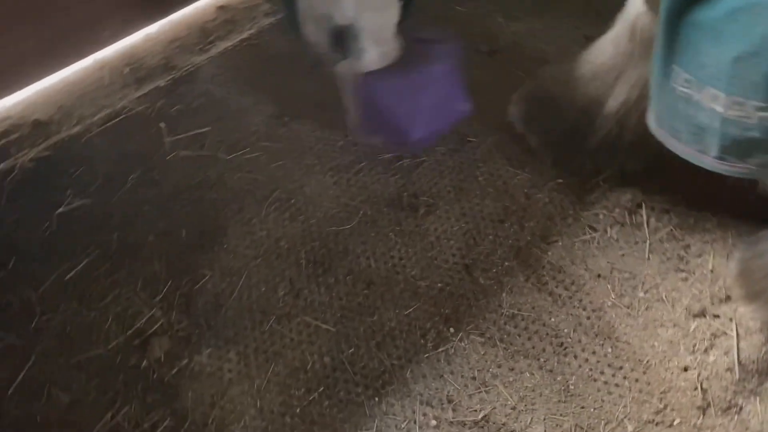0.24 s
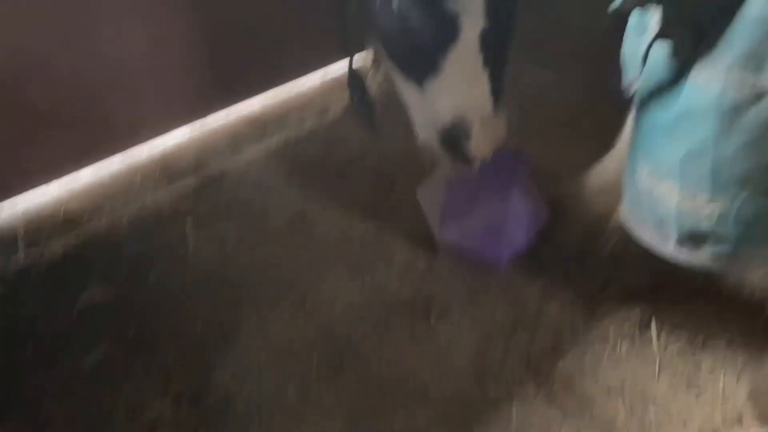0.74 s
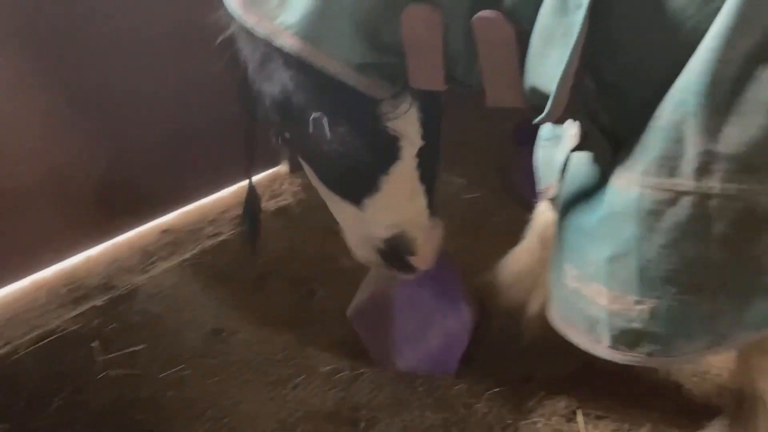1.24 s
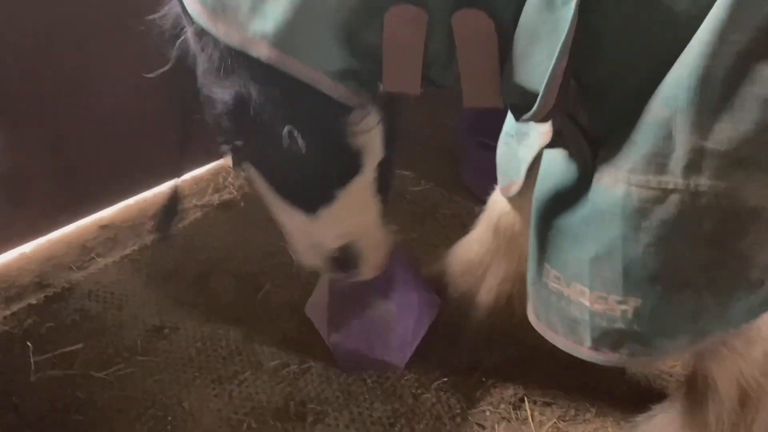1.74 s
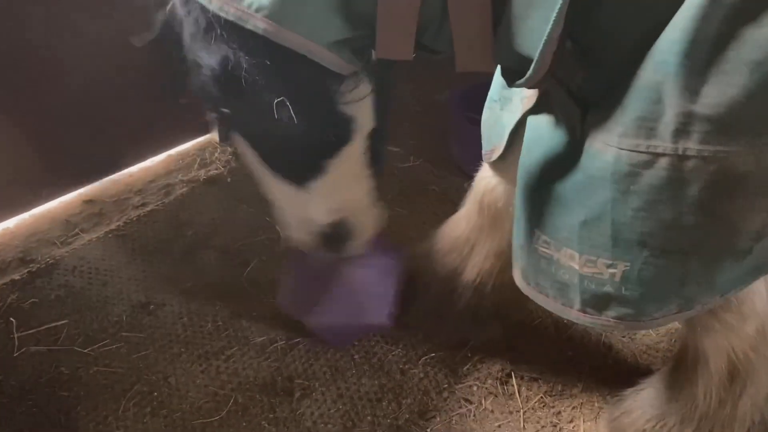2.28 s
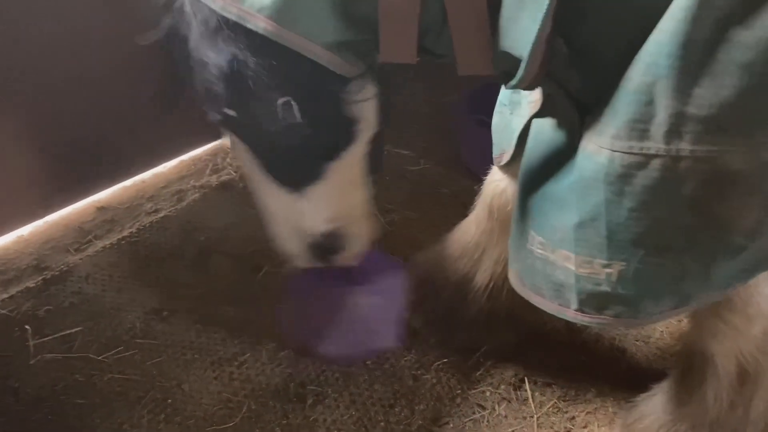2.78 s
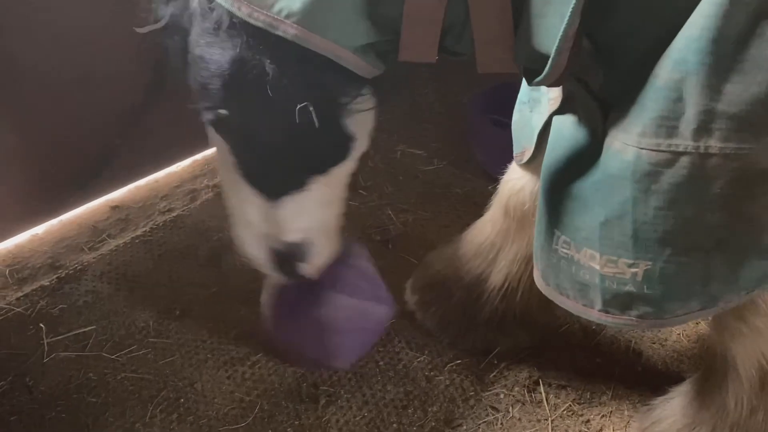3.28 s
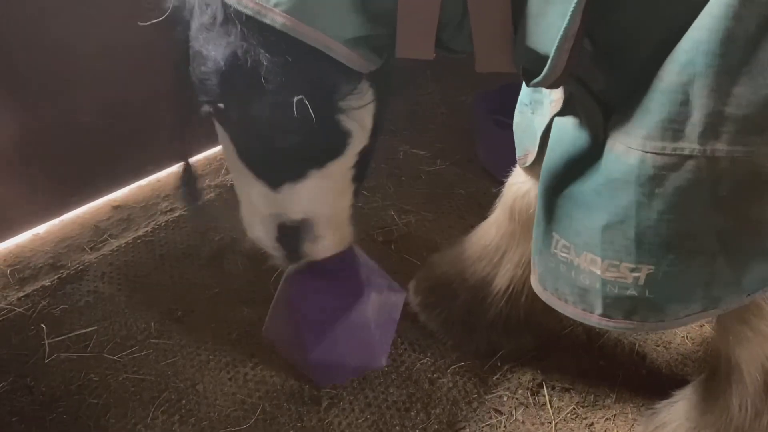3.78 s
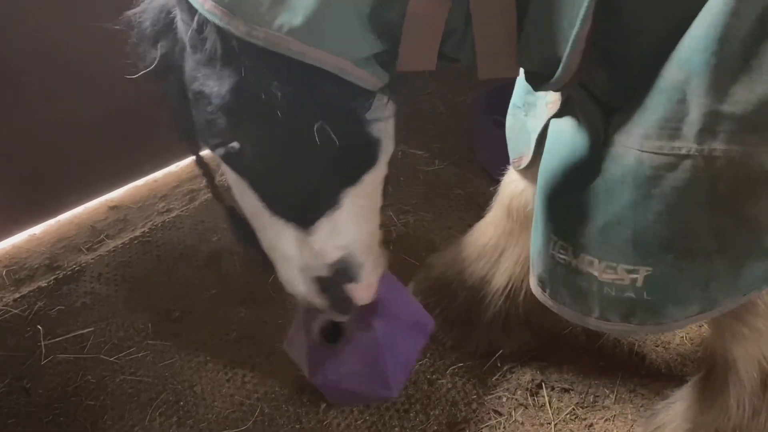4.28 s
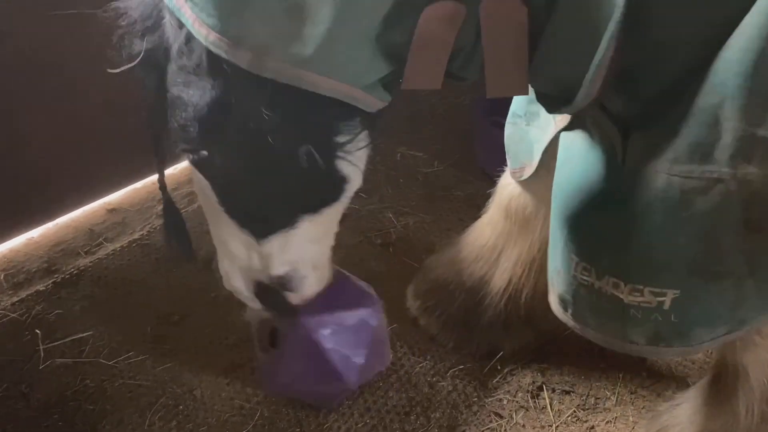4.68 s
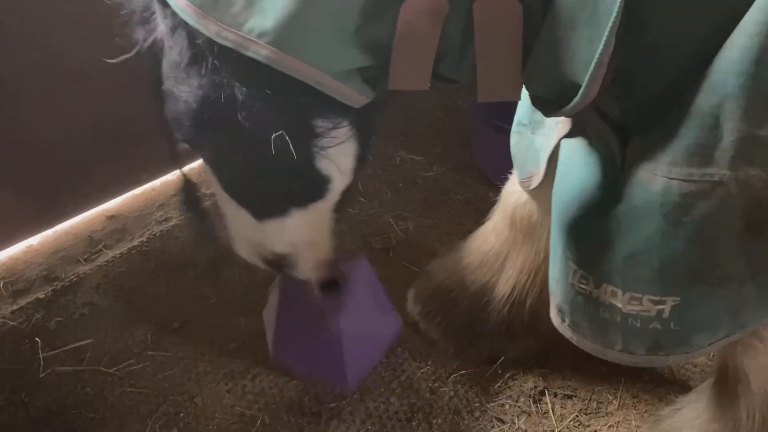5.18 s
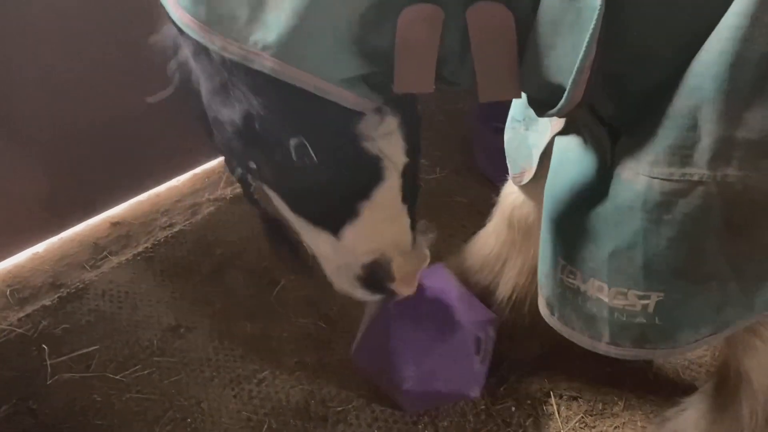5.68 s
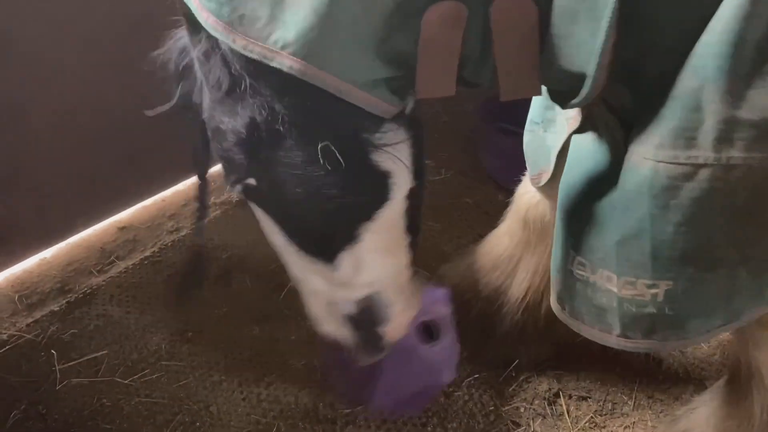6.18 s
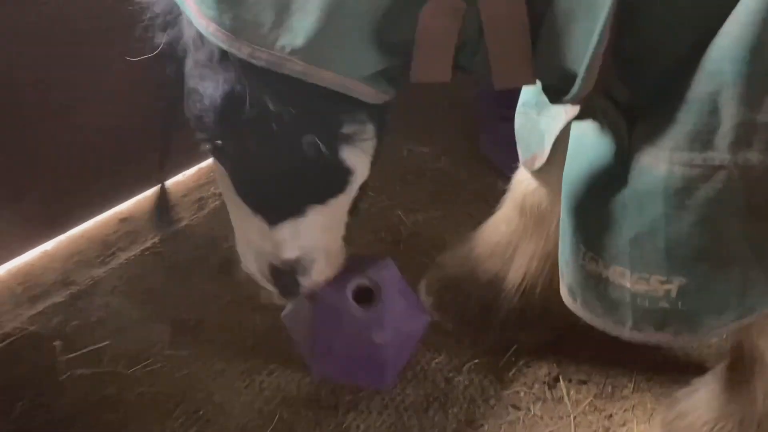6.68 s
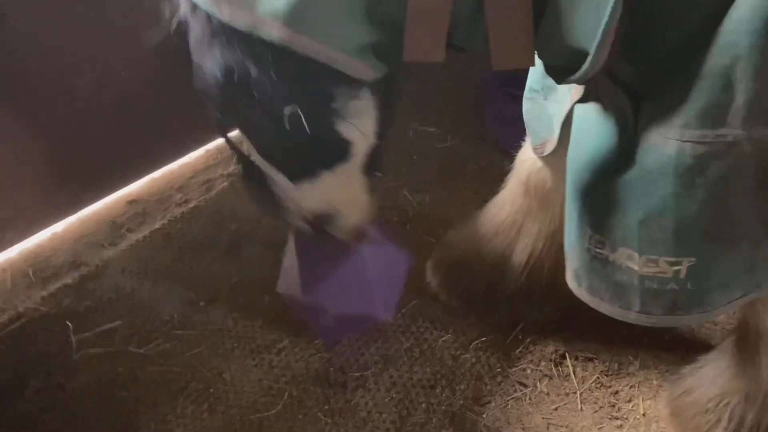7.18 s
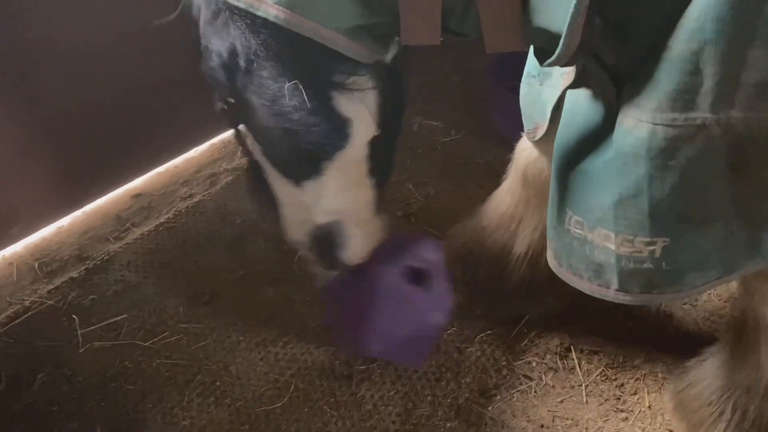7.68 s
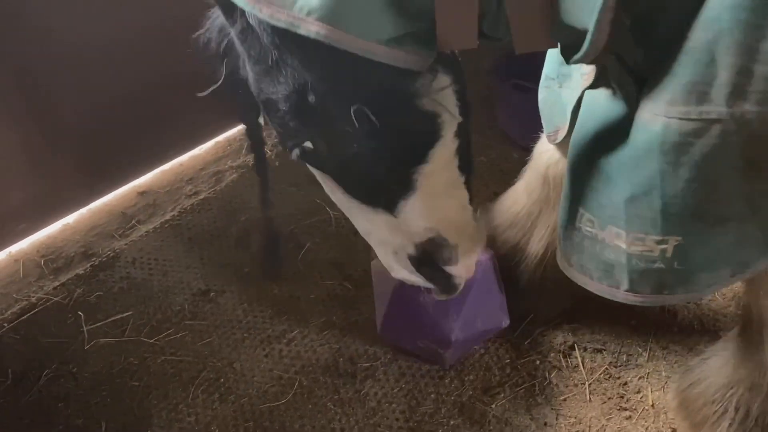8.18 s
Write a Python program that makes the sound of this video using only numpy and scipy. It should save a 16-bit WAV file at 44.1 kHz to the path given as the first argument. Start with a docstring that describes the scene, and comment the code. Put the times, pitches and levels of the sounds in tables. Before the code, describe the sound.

A horse noses a hollow hard plastic treat ball over a stable's rubber mat, pellets rattling and swishing inside between dull knocks.

```python
"""Treat ball in a stable

A horse noses a hollow, many-sided plastic treat ball over the rubber mat of its stable.
Feed pellets are random impacts, coloured by the face they hit and smeared by short dense rings.
Each tip onto a face is a hollow note that sags in pitch, with bass and a knock; the cavity drones and booms.
Light taps ring the shell and brushing is swelling hiss; a wavering hum and a quiet room lie behind."""
import sys
import numpy as np
from scipy import signal
from scipy.fft import rfft, irfft, next_fast_len
from scipy.io import wavfile

SR = 44100
rng = np.random.default_rng(int(sys.argv[2]) if len(sys.argv) > 2 else 0)


def unload_wav(signal):
    """Save mono or channel-first audio to the path in sys.argv[1] as 16-bit WAV at rate SR, clipped to [-1, 1]."""
    wavfile.write(
        sys.argv[1],
        SR,
        np.round(np.clip(np.atleast_2d(signal).T, -1, 1) * 32767).astype(np.int16),
    )


N = 372204
TIME = np.arange(N) / SR
PADDED = next_fast_len(N + SR)   # room for tails to ring past the end
FREQS = np.maximum(np.fft.rfftfreq(PADDED, 1 / SR), 1)
CUTOFF_HZ = 16000


def from_db(db):
    """Decibels to gain."""
    return 10 ** (np.asarray(db) / 20)


def rms_one(x):
    """Scale to unit rms."""
    return x / np.sqrt(np.mean(x ** 2) + 1e-20)


def at_hz(points):
    """A table read over log frequency, at every bin."""
    hz, value = np.transpose(points)
    return np.interp(np.log(FREQS), np.log(np.maximum(hz, 1)), value)


def colour(x, response):
    """Pass a sound through a frequency response."""
    return irfft(rfft(x, PADDED) * response, PADDED)[..., :N]


def drift(per_s):
    """Slow random wandering around zero: normal random knots, per_s of them a second, joined by lines."""
    knots = rng.standard_normal(4000)
    return np.interp(TIME * per_s, np.arange(len(knots)), knots)


def resonance(hz, width_hz):
    """Response of one damped resonance, 1 at its top."""
    return 1 / (1 + 1j * (FREQS ** 2 - hz ** 2) / (FREQS * width_hz))


def dense_ring(t60):
    """Response of countless close modes dying together, unit energy."""
    t = TIME[:SR // 2]
    tail = rng.standard_normal(len(t)) * from_db(-60 * t / t60)
    return rfft(tail / np.linalg.norm(tail), PADDED)


def ring_pair(t60):
    """Two independent dense rings, one for each side."""
    return np.array([dense_ring(t60), dense_ring(t60)])


def mode_ring(modes):
    """Sum of sine modes that each die away at their own rate."""
    return sum(from_db(db - 60 * TIME / t60) * np.sin(2 * np.pi * hz * TIME) for hz, db, t60 in modes)


def to_stereo(direct, scattered):
    """Direct sound is shared by left and right with a phase difference set per band; scattered differs in each."""
    # phase of left relative to right: frequency_hz, phase_rad
    side_phase = [(0, 0.38), (690, 0.5), (1290, 7.12), (2330, 12.15), (3270, 13.9), (4220, 11.22),
                  (6370, 18.73), (9650, 15.0), (10400, 12.6), (11700, 12.3), (12500, 8.92), (13800, 9.18),
                  (14600, 6.08), (16500, 4.98)]
    # level of left relative to right: frequency_hz, balance_db
    side_balance = [(60, 6), (170, 0), (330, 2), (620, 3.5), (850, 7), (1400, 5.5), (2500, 2), (5000, 3),
                    (8000, -0.5)]
    # share of power that is direct on both sides: frequency_hz, likeness (0-1)
    side_likeness = [(100, 0.77), (350, 0.83), (700, 0.49), (1400, 0.42), (2400, 0.69), (4500, 0.28),
                     (9000, 1), (15000, 0.62)]
    alike = np.clip(at_hz(side_likeness), 0, 1)
    halves = np.array([[.5], [-.5]])   # each side takes half the difference
    turn = np.exp(1j * at_hz(side_phase) * halves)
    balance = from_db(at_hz(side_balance) * halves)
    spectrum = balance * (np.sqrt(alike) * direct * turn + np.sqrt(1 - alike) * scattered)
    return irfft(spectrum, PADDED)[:, :N]


def background(hum_hz, waver_hz):
    """A hum wavering in pitch and level, swelling once, over faint coloured room noise."""
    # colour of the quiet stable: frequency_hz, density_db (relative, per Hz)
    air_colour = [(25, -10.5), (60, 8.5), (120, -3), (250, -3.5), (500, -9.5), (1500, -24), (4000, -33),
                  (15000, -38.5)]
    hum_db, air_db = -61, -56.5   # the hum's level is before its swell
    swell_at_s, swell_half_s, swell_db = 7.87, 0.2, 12.5
    level_db = hum_db + swell_db * np.exp(-((TIME - swell_at_s) / swell_half_s) ** 2)
    phase = 2 * np.pi * np.cumsum(hum_hz + waver_hz * drift(per_s=90)) / SR
    unsteady = from_db(5 * np.minimum(drift(per_s=25), 1))
    hum = rms_one(np.sin(phase) * unsteady)
    # one noise shared by both sides, and a weaker one for each
    noise = rng.standard_normal(N) + .5 * rng.standard_normal((2, N))
    air = colour(noise, from_db(at_hz(air_colour)))
    return from_db(level_db) * hum + from_db(air_db) * rms_one(air)


def flow_db():
    """Level of the sliding pellets: every nudge swells, holds and settles."""
    # nudges that roll the ball: full_flow_s, hold_s, level_db
    nudge_table = [(0.11, 0.0037, -40.5), (0.192, 0.13, -34.5), (0.57, 0.11, -27.5), (0.935, 0.14, -33),
                   (1.111, 0.21, -27.5), (1.37, 0.087, -28), (1.542, 0.043, -28.5), (1.62, 0.19, -34),
                   (1.909, 0.042, -18.5), (2.049, 0.39, -31), (2.21, 0.0065, -19.5), (2.29, 0.052, -32),
                   (2.422, 0.075, -25.5), (2.72, 0.078, -22), (2.87, 0.061, -32.5), (2.974, 0.15, -23.5),
                   (3.2, 0.033, -40.5), (3.31, 0.13, -49.5), (3.896, 0.13, -47), (4.057, 0.057, -28),
                   (4.228, 0.0081, -44), (4.437, 0.064, -37), (4.61, 0.31, -34), (4.9, 0.21, -40),
                   (5.101, 0.095, -23.5), (5.29, 0.26, -38), (5.485, 0.1, -21), (5.844, 0.071, -27),
                   (6.1, 0.17, -33.5), (6.33, 0.042, -39), (6.433, 0.11, -24), (6.6, 0.16, -38.5),
                   (6.972, 0.085, -39), (7.08, 0.065, -28.5), (7.2, 0.07, -39.5), (7.46, 0.15, -44),
                   (7.65, 0.074, -21.5), (7.82, 0.18, -54), (8.167, 0.15, -35.5), (8.299, 0.14, -33),
                   (8.411, 0.046, -23.5)]
    swell_db_per_s, settle_db_per_s = 235, 199.5
    stirring_db = -61.5   # a few pellets never lie quite still
    power = from_db(stirring_db) ** 2
    for s, hold_s, db in nudge_table:
        before_db = swell_db_per_s * np.maximum(s - TIME, 0)
        after_db = settle_db_per_s * np.maximum(TIME - s - hold_s, 0)
        power = power + from_db(db - np.minimum(before_db + after_db, 100)) ** 2
    return 10 * np.log10(power)


def clatter_power(rise_s, slap_s):
    """A heap lands with a slap and then settles: power of its body and of its treble."""
    # heaps of pellets landing on a wall: start_s, level_db (before trim), t60_s, treble_db (relative)
    clatter_table = [(0.139, -25, 0.13, -16), (0.216, -19.5, 0.062, -3.5), (0.272, -24, .04, 9.5),
                     (0.36, -34, 0.17, -3.5), (0.456, -20, 0.043, -15.5), (0.536, -25.5, 0.093, -5.5),
                     (0.599, -18, 0.11, 3.5), (0.738, -25, 0.011, 10.5), (0.914, -39.5, 0.25, -1),
                     (0.969, -28.5, 0.017, 19), (0.998, -21.5, 0.19, -6), (1.082, -29.5, 0.15, 1),
                     (1.141, -27, 0.176, 10.5), (1.305, -17.5, 0.094, 0.5), (1.338, -20, 0.072, 2.5),
                     (1.417, -13.5, 0.034, -18), (1.554, -21.5, 0.12, -7.5), (1.492, -23, 0.08, 9.5),
                     (1.509, -11, 0.035, 1.5), (1.7, -20.5, 0.22, -2), (1.783, -16, 0.085, -4),
                     (1.871, -19.5, 0.033, 8), (1.883, -18, 0.21, 2), (1.912, -16, 0.18, 6),
                     (1.954, -19.5, 0.2, 9.5), (2.098, -18.5, 0.069, -12.5), (2.165, -21, 0.27, 9),
                     (2.191, -14, 0.31, 10), (2.375, -18, 0.088, 4), (2.398, -20.5, 0.031, 1),
                     (2.436, -17, 0.045, 6.5), (2.605, -20.5, 0.093, -5.5), (2.717, -21, 0.04, 7.5),
                     (2.779, -8, 0.042, 5), (2.958, -20.5, 0.042, -8), (3.014, -23.5, 0.14, 7.5),
                     (3.325, -35.5, 0.04, -12), (3.728, -37.5, 0.17, -20), (3.973, -22, 0.15, -13.5),
                     (4.025, -16, 0.26, -16), (4.385, -26.5, 0.14, -4), (4.397, -20.5, 0.035, 8.5),
                     (4.531, -28, 0.11, -8), (4.574, -32.5, 0.15, -9), (4.638, -22.5, 0.037, -6),
                     (4.704, -27.5, 0.039, 1), (4.769, -29.5, 0.066, 4), (4.825, -24.5, 0.22, 4),
                     (5.005, -18, 0.073, 4.5), (5.081, -31, 0.044, 4), (5.179, -18.5, 0.057, 9),
                     (5.342, -25, 0.043, -6), (5.429, -15.5, 0.063, -30), (5.469, -21.5, 0.073, -15),
                     (5.497, -13, 0.035, 3.5), (5.54, -15, .04, 14), (5.584, -20, .035, 15),
                     (5.742, -26.5, 0.099, 5), (5.855, -18, 0.02, 17), (5.954, -30.5, 0.1, 15),
                     (6.007, -29.5, 0.049, 15), (6.132, -9, 0.03, -5), (6.146, -22, 0.25, -9),
                     (6.199, -20, 0.0343, 4), (6.236, -21.5, 0.021, 4.5), (6.381, -21.5, 0.024, 8),
                     (6.593, -20.5, 0.027, -3), (6.646, -24.5, .035, 13.5), (6.665, -24, 0.032, 11),
                     (6.714, -19.5, 0.044, 2.5), (6.845, -32.5, 0.044, 6.5), (6.96, -28, 0.057, -10),
                     (7.126, -25, 0.047, 9), (7.221, -22, 0.028, 8), (7.527, -27, 0.29, -7.5),
                     (7.609, -19, 0.18, -8), (7.685, -18, 0.088, 2), (8.126, -33, 0.21, -12),
                     (8.188, -24.5, 0.031, -1), (8.292, -29.5, .04, 17), (8.383, -21.5, 0.1, 9),
                     (8.422, -14.5, 0.12, -23)]
    power = np.zeros((2, N))
    for s, db, t60, treble_db in clatter_table:
        start = int(s * SR)
        t = TIME[:min(SR // 3, N - start)]
        settle = from_db(db - 60 * t / max(t60, .01))
        level = settle * (1 - np.exp(-t / rise_s)) * (1 + np.exp(-t / slap_s))
        power[:, start:start + len(t)] += (level * from_db([[0], [treble_db]])) ** 2
    return power


def face_colours(uneven_db, count, size=16):
    """The shell's response as heard from each face: every face favours other bands."""
    # broad colour of the plastic shell under the pellets: frequency_hz, density_db (relative, per Hz)
    shell_colour = [(60, -17.5), (200, -18.5), (330, -14.5), (470, -12), (650, -4.5), (1000, -5),
                    (1700, -3), (2600, -2), (3400, -6.5), (4600, -10), (6300, -17), (8000, -20.5),
                    (11000, -30.5), (15500, -36)]
    # wall resonances that stand out of it: frequency_hz, width_hz, lift_db
    wall_modes = [(555, 110, 4), (607, 28, 5), (842, 29, 5.5), (950, 57, 3.5), (1265, 680, 2),
                  (2370, 10, 1)]
    shell = from_db(at_hz(shell_colour))
    for hz, width_hz, lift_db in wall_modes:
        shell = shell * (1 + (from_db(lift_db) - 1) * resonance(hz, width_hz))
    shell = shell / np.sqrt(np.mean(abs(shell) ** 2))
    centres = np.geomspace(400, CUTOFF_HZ, size)
    own = []
    for face in range(count):
        lifts_db = uneven_db * rng.standard_normal(size)
        own.append(from_db(at_hz(np.c_[centres, lifts_db])))
    own = np.array(own)
    return shell * own / np.linalg.norm(own, axis=0)   # the faces share the power of each band


def pellet_hits(level, per_s, spread_db):
    """Random impacts of uneven size and either sign with the given rms level."""
    chance = np.clip(per_s / SR, 1e-4, .5)
    sizes = rms_one(from_db(spread_db * np.clip(rng.standard_normal(N), -2, 1.6)))
    struck = rng.random(N) < chance
    return level * struck * sizes * rng.choice([-1, 1], N) / np.sqrt(chance)


def pellets(slide_db, clatter_db, ring_share, shell_t60, scatter_t60):
    """Pellets wander from face to face of the shell; each face gives ticks and short rings of its own."""
    usual_flow_db, bite_db, bite_per_db = -29.5, -4, 0.7051   # faster pellets tick harder
    level_db = flow_db()
    treble_db = bite_db + bite_per_db * (level_db - usual_flow_db)
    sliding = from_db(level_db + slide_db)
    heap, heap_treble = from_db(clatter_db) ** 2 * clatter_power(rise_s=0.0025, slap_s=.004)
    level = np.sqrt(sliding ** 2 + heap)
    sharpness = np.sqrt((sliding * from_db(treble_db)) ** 2 + heap_treble) / level
    landing = heap / level ** 2
    # sliders hop singly, a heap lands all at once
    per_s = 85 + 120 * np.sqrt(sliding / from_db(usual_flow_db)) + 900 * landing

    mid_hz, treble_hz, wander_db, hardness_db = 2240, 5100, 3.0, 7.0
    mid, treble = 1 / (1 + (np.array([[mid_hz], [treble_hz]]) / FREQS) ** 4)
    share = np.clip(ring_share, 0, 1)
    direct, scattered = 0, 0
    for face in face_colours(uneven_db=4.5, count=7):
        # sliders linger on some faces; landing heaps spread evenly
        visits = rms_one(from_db(wander_db * drift(per_s=35))) ** (1 - landing)
        hits = pellet_hits(level * visits, per_s, spread_db=6.5)
        # a corner ticks brighter than a flat side; soft contacts lose the treble first, then the mids
        hard = sharpness * rms_one(from_db(hardness_db * np.clip(rng.standard_normal(N), -2, 2)))
        low, middle, high = rfft(np.array([hits, hits * hard ** 0.22, hits * hard]), PADDED)
        force = face * (low * (1 - mid) + middle * (mid - treble) + high * treble)
        direct = direct + force * (np.sqrt(1 - share) + np.sqrt(share) * dense_ring(shell_t60))
        scattered = scattered + force * ring_pair(scatter_t60)

    # single pellets click through the rasp
    clicks_per_s, click_share = 150, .3
    clicks = rfft(pellet_hits(level * np.sqrt(sharpness), clicks_per_s, spread_db=5.5), PADDED)
    clicks = clicks * face_colours(uneven_db=2, count=1)[0]
    rasp_gain = np.sqrt(1 - click_share)
    single = np.sqrt(click_share) * clicks
    return to_stereo(rasp_gain * direct + single,
                     rasp_gain * scattered + single * ring_pair(scatter_t60))


def cavity(shaking, hz, width_hz, drone_db):
    """The shaken walls keep the air behind the ball's hole droning."""
    return from_db(drone_db) * colour(shaking.mean(axis=0), resonance(hz, width_hz))


def taps(soft_hz, scatter_t60):
    """A light touch rings the middle modes of the shell, its treble softened."""
    # light taps on the shell: start_s, level_db
    tap_table = [(0.03, -34), (3.415, -24.5), (3.439, -29), (7.291, -21.5)]
    # what a tap rings with, before softening: frequency_hz, level_db (relative), t60_s
    tap_modes = [(890, -14, 0.026), (1170, -3, 0.024), (1740, -3, 0.012)]
    strikes = np.zeros(N)
    for s, db in tap_table:
        strikes[int(s * SR)] = from_db(db)
    spectrum = rfft(strikes, PADDED) * rfft(mode_ring(tap_modes), PADDED) / (1 + 1j * FREQS / soft_hz)
    return to_stereo(spectrum, spectrum * ring_pair(scatter_t60))


def brushes(low_hz, high_hz):
    """Hair slides over plastic: a smooth, bright hiss that swells and fades."""
    # the muzzle brushing over the ball: centre_s, level_db, half_length_s
    brush_table = [(0.033, -61, .04), (3.505, -58, 0.039), (4.263, -55, 0.043), (7.484, -50.5, 0.049),
                   (7.93, -63, 0.086)]
    swell = sum(from_db(db) * np.exp(-((TIME - s) / half_s) ** 2) for s, db, half_s in brush_table)
    band = signal.butter(1, [low_hz, high_hz], "band", fs=SR, output="sos")
    hiss = signal.sosfilt(band, rng.standard_normal((2, N)))
    return swell * rms_one(hiss)


def soft_pulse(hz, width_hz, slowness, size=8192):
    """A pulse of height 1 with its energy around hz, its lows trailing as in a bending wave."""
    f = np.maximum(np.fft.rfftfreq(size, 1 / SR), 1)
    front_hz = 600   # everything above arrives together
    delay = slowness * np.maximum(f ** -.5 - front_hz ** -.5, 0)
    travel = np.exp(-2j * np.pi * np.cumsum(delay) * SR / size)
    pulse = irfft(travel / (1 + 1j * (f ** 2 - hz ** 2) / (f * width_hz)) ** 2)
    return pulse / abs(pulse).max()


def hollow_note(hz, t60, rise_s, sag, sag_s):
    """The note swells as a face presses into the mat, sags onto the ball's pitch and dies."""
    t = TIME[:8192]
    phase = 2 * np.pi * np.cumsum(hz * (1 + sag * np.exp(-t / sag_s))) / SR
    press = np.sin(np.pi / 2 * np.minimum(t / rise_s, 1)) ** 4
    decay = from_db(-60 * np.maximum(t - rise_s, 0) / t60)
    return press * decay * np.sin(phase)


def thumps(body_db, low_db, knock_trim_db, rock_db, rock_t60, scatter_t60):
    """A face slaps the mat: a knock, a dull drop in pitch, a brief rocking and the ball's own rings."""
    # the ball tipping onto a face: start_s, level_db, settled_pitch_hz,
    # bass_db and knock_db (both relative, before trim)
    thump_table = [(0.099, -30, 301, -5.5, -16), (0.452, -14, 333, -15, -7), (0.599, -24.5, 288, -17, -16),
                   (0.961, -12, 312, -18, -26), (1.082, -25, 334, -5.5, -16), (1.295, -28.5, 317, -13, -18),
                   (1.505, -39, 376, 12, 7), (1.697, -20, 298, -10.5, -22), (1.778, -18.5, 332, -9, -16),
                   (1.954, -15.5, 298, -14, -20), (2.093, -22, 306, -15, -18), (2.196, -21.5, 330, -8, -18),
                   (2.605, -20.5, 323, -11, 2.5), (2.81, -15, 294, -18, -18), (3.073, -18, 297, -8.5, -18),
                   (3.34, -41, 290, -21, -17), (3.417, -39, 290, -23, -14), (3.877, -28, 294, -3.5, -9),
                   (4.017, -21, 298, -15, -20), (4.574, -23, 295, -8, 2.5), (4.724, -32.5, 283, -17, -2),
                   (4.821, -19.5, 291, -18, -18), (4.997, -36, 352, -4.5, -18), (5.158, -22, 291, -27, -18),
                   (5.465, -23.5, 302, -24, -18), (5.734, -23.5, 307, -21, -7),
                   (6.439, -25.5, 302, -17, -18), (6.915, -28.5, 307, -12, -7),
                   (7.159, -32.5, 319, -0.5, -4), (7.606, -22, 286, -20, -24),
                   (8.314, -34.5, 310, -12, -18)]
    # upper ring of the ball: frequency_hz, level_db (relative to the thump), t60_s
    ball_rings = [(612, -11, 0.05)]
    sound, strikes = np.zeros((2, N + SR))
    chances = rng.standard_normal((len(thump_table), 3))
    for (s, db, hz, bass_db, knock_db), chance in zip(thump_table, chances):
        tuning = from_db(0.25 * chance[:2])   # each face lands a little differently
        slowness = 0.2116 * from_db(2 * chance[2])
        pulse = from_db(body_db) * hollow_note(hz, t60=0.055, rise_s=0.0058, sag=0.96, sag_s=0.0022)
        pulse += from_db(bass_db + low_db) * soft_pulse(88 * tuning[0], 200, slowness)
        pulse += from_db(knock_db + knock_trim_db) * soft_pulse(600 * tuning[1], 760, slowness)
        pulse += from_db(-14) * soft_pulse(198, 210, slowness)   # the note drops away into the mat
        t = TIME[:len(pulse)]
        rocking = rng.standard_normal(len(t)) * t * from_db(-60 * t / rock_t60)
        rocking = rocking / np.linalg.norm(rocking)
        pulse += from_db(rock_db) * signal.fftconvolve(pulse, rocking)[:len(t)]
        start = int(s * SR)
        sound[start:start + len(t)] += from_db(db) * pulse
        strikes[start] = from_db(db)
    spectrum = rfft(sound, PADDED) + rfft(strikes, PADDED) * rfft(mode_ring(ball_rings), PADDED)
    # hole and shell cancel between their pitches
    spectrum = spectrum * (1 - 1.3 * resonance(hz=217, width_hz=9.6))
    mat_hz = 2500
    spectrum = spectrum / (1 + 1j * FREQS / mat_hz)   # the rubber mat softens the slap
    return to_stereo(spectrum, spectrum * ring_pair(scatter_t60))


def booms(waver_db):
    """The air in the ball booms at its hole: low hollow tones that swell, glide in pitch and fade."""
    # booms: start_s, length_s, level_db (before waver), first_pitch_hz, last_pitch_hz (before waver)
    boom_table = [(1.953, 0.36, -45, 125.8, 118), (2.702, .22, -40.5, 114, 125),
                  (3.072, 0.16, -40.5, 121, 119), (4.86, 0.25, -49.5, 115, 125),
                  (6.954, 0.093, -43.5, 76, 121), (7.192, 0.14, -48, 109, 145)]
    rise_s, fade_s, pitch_waver_hz = 0.012, 0.037, 24
    out = np.zeros(N + SR)
    for s, length_s, db, first_hz, last_hz in boom_table:
        t = TIME[:int(length_s * SR)]
        glide_hz = np.linspace(first_hz, last_hz, len(t))
        pitch_hz = glide_hz + pitch_waver_hz * drift(per_s=130)[:len(t)]
        phase = 2 * np.pi * np.cumsum(pitch_hz) / SR
        envelope = np.minimum(t / rise_s, 1) * np.minimum((length_s - t) / fade_s, 1)
        start = int(s * SR)
        out[start:start + len(t)] += from_db(db) * envelope * np.sin(phase)
    return out[:N] * from_db(waver_db * drift(per_s=44))


def stable(x, wet_db, dull_hz):
    """A short, dull tail from the wooden walls."""
    tails = ring_pair(t60=0.33)
    return from_db(wet_db) * colour(x, tails / (1 + 1j * FREQS / dull_hz))


def scene():
    """The ball in the stable: its sounds and their tail, the brushing muzzle and the background."""
    rattle = pellets(slide_db=0, clatter_db=-.5, ring_share=0.6, shell_t60=0.048, scatter_t60=0.046)
    tipping = thumps(body_db=2.5, low_db=1.5, knock_trim_db=4, rock_db=-12.5, rock_t60=0.087,
                     scatter_t60=0.11)
    shaking = rattle + from_db(-9.0) * tipping
    drone = cavity(shaking, hz=121, width_hz=21, drone_db=3.5)
    ball = rattle + tipping + drone + booms(waver_db=3.5) + taps(soft_hz=2500, scatter_t60=.03)
    tail = stable(ball, wet_db=-12, dull_hz=3600)
    muzzle = brushes(low_hz=2450, high_hz=10600)
    return ball + tail + muzzle + background(hum_hz=293, waver_hz=20)


def record(dry):
    """The deepest bass is rolled off, the highest peaks are rounded and the top is cut steeply."""
    dry = signal.sosfilt(signal.butter(2, 38, "high", fs=SR, output="sos"), dry)
    dry = np.tanh(dry)
    return signal.sosfilt(signal.ellip(10, .1, 70, CUTOFF_HZ, fs=SR, output="sos"), dry)


dry = scene()
out = record(dry)
unload_wav(out)
```